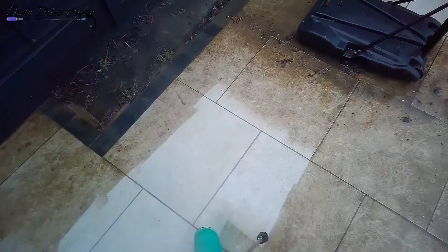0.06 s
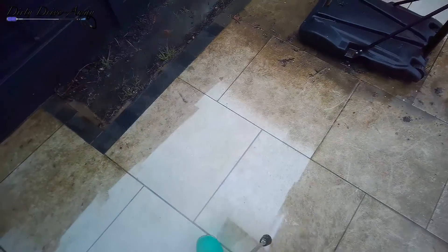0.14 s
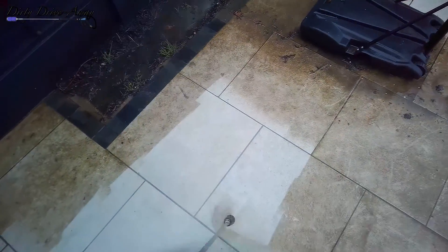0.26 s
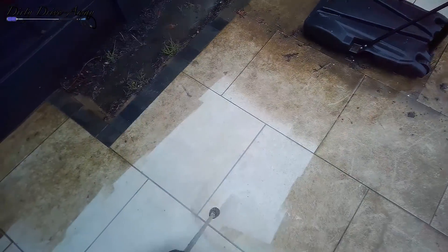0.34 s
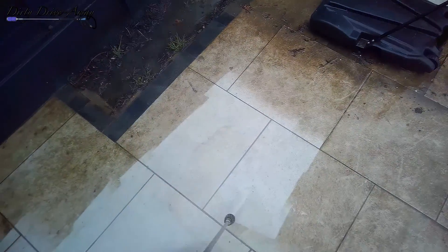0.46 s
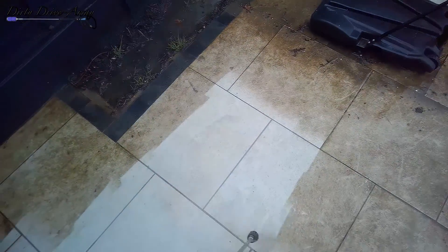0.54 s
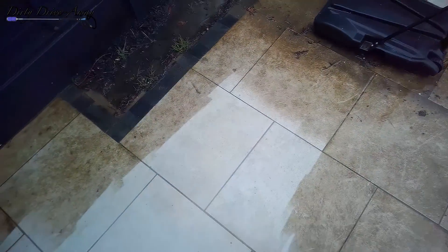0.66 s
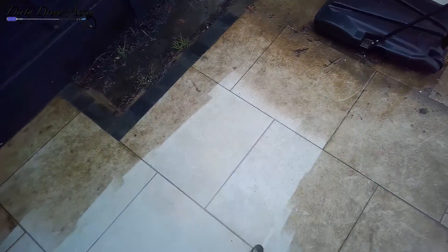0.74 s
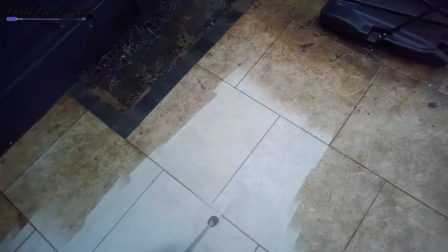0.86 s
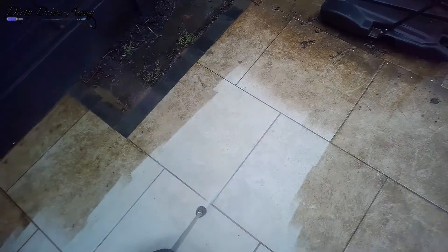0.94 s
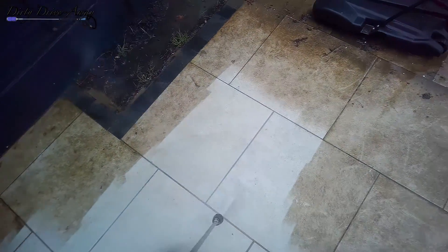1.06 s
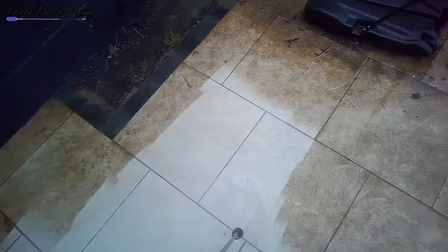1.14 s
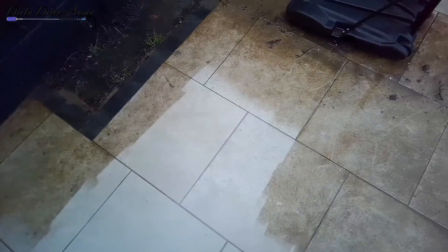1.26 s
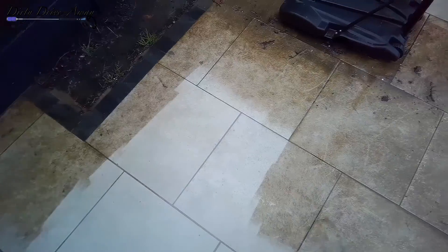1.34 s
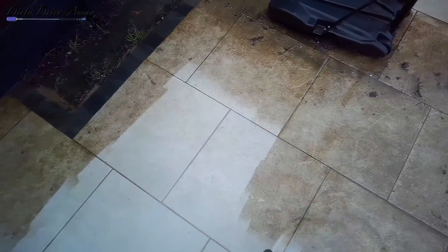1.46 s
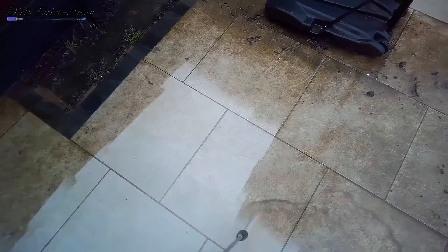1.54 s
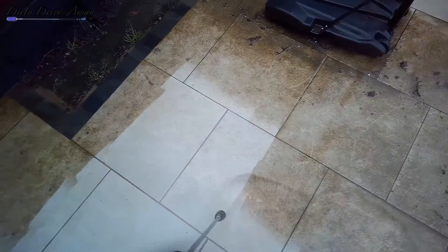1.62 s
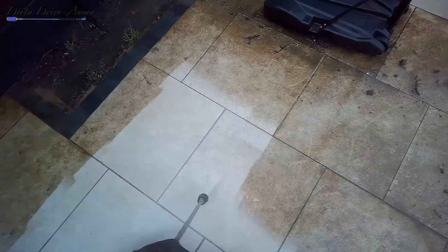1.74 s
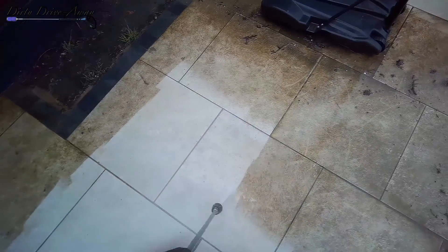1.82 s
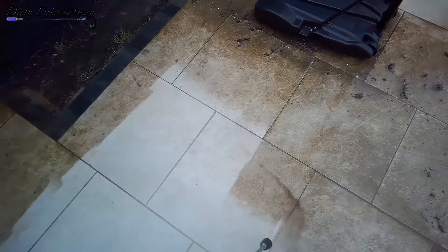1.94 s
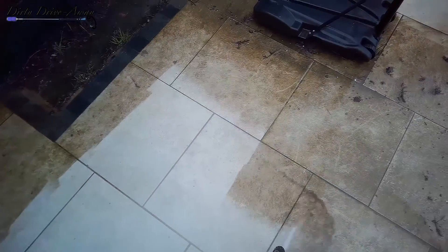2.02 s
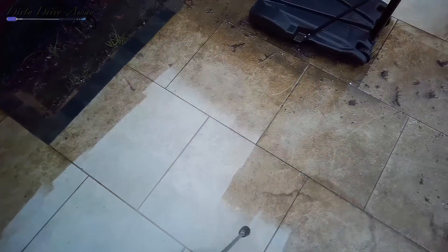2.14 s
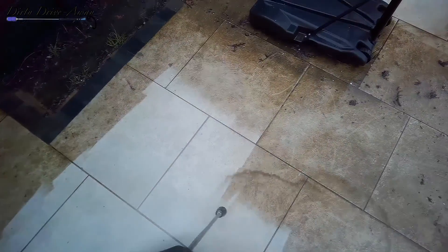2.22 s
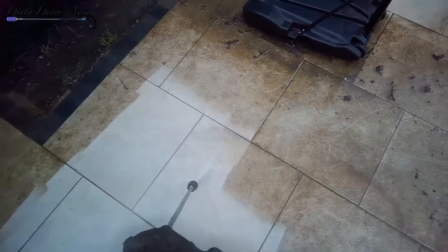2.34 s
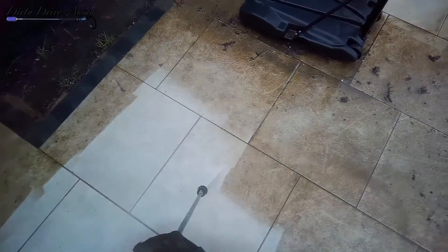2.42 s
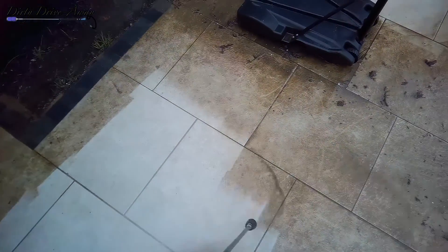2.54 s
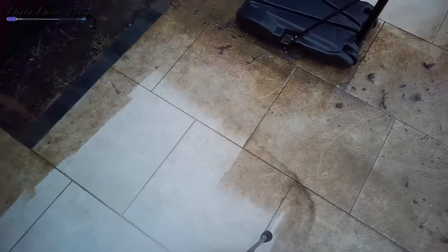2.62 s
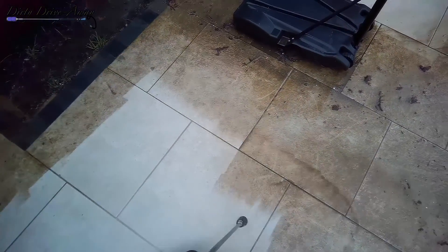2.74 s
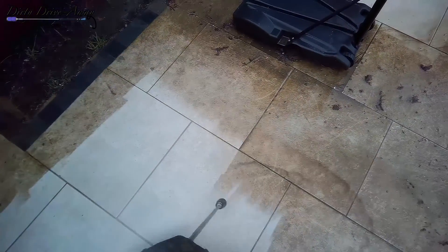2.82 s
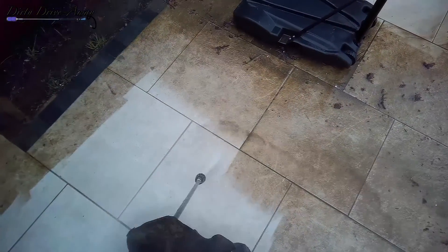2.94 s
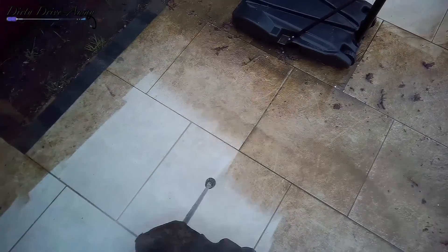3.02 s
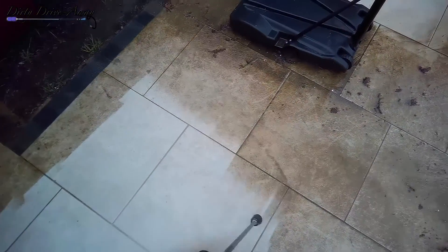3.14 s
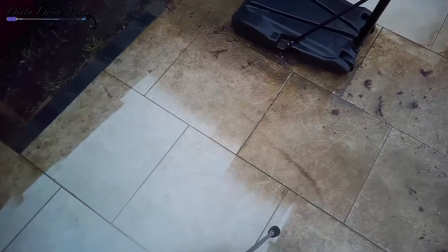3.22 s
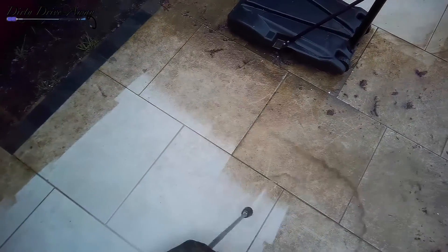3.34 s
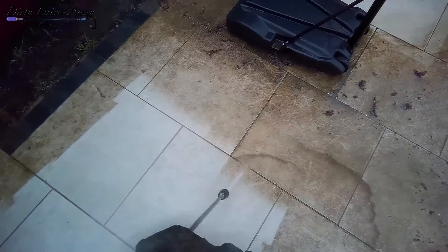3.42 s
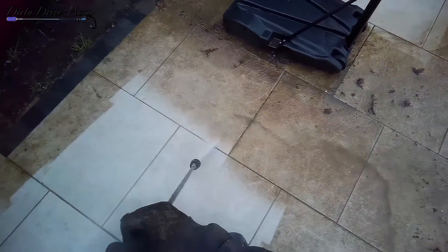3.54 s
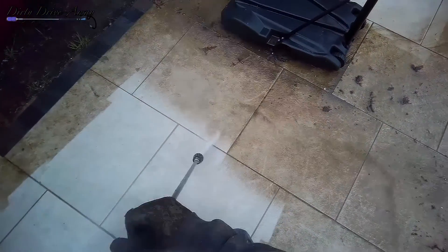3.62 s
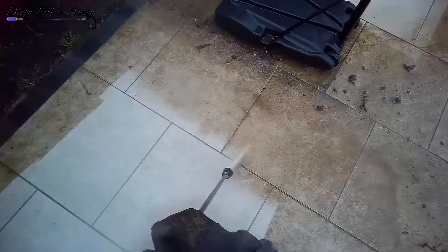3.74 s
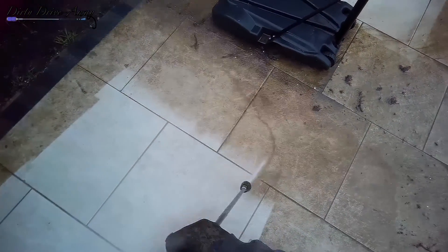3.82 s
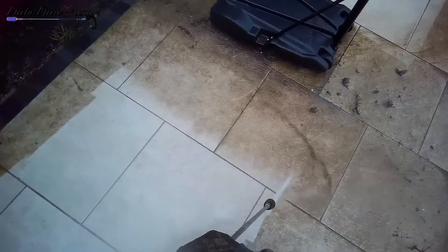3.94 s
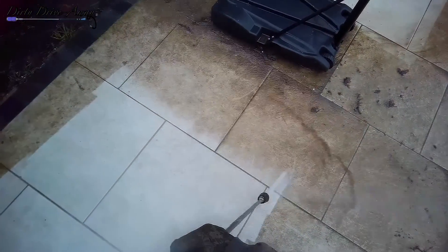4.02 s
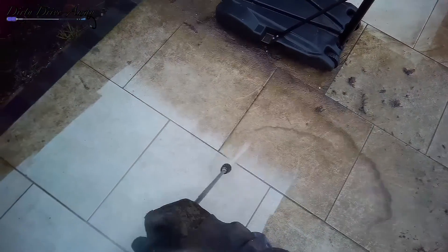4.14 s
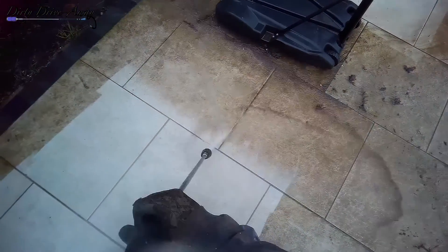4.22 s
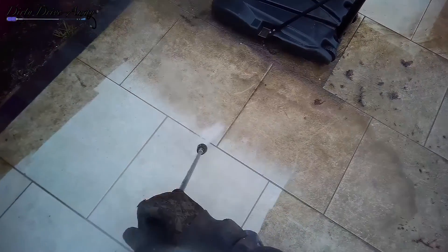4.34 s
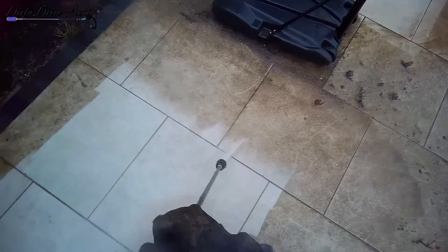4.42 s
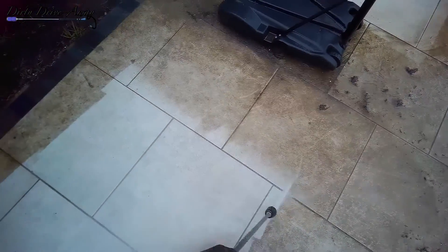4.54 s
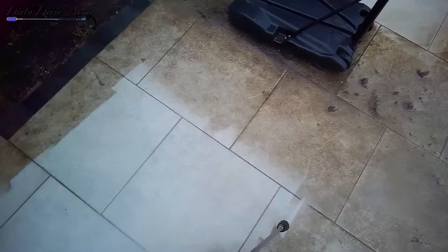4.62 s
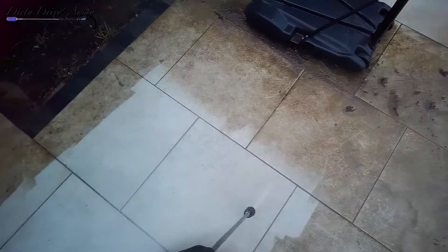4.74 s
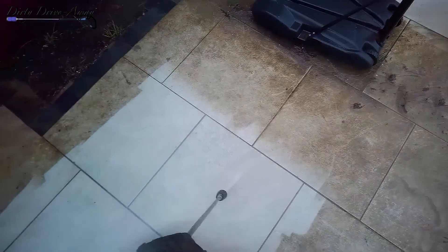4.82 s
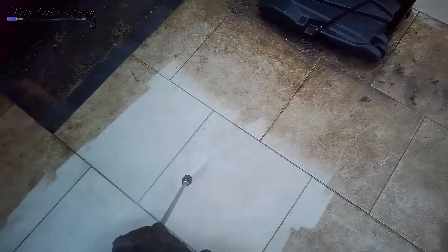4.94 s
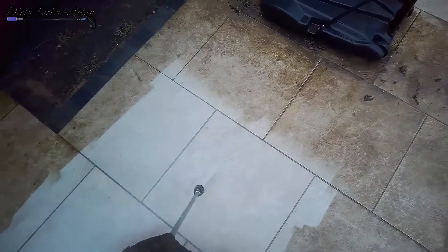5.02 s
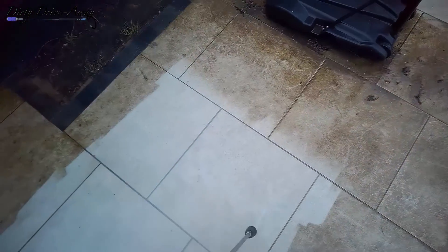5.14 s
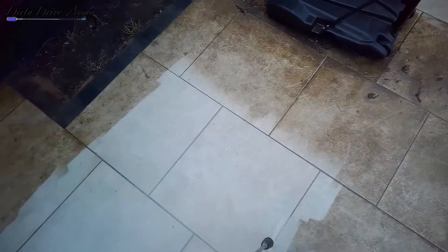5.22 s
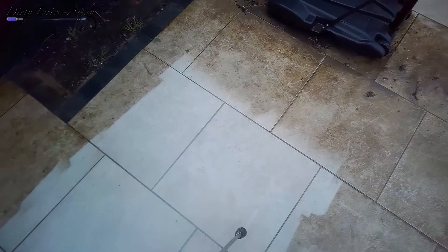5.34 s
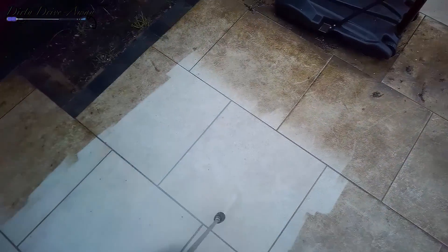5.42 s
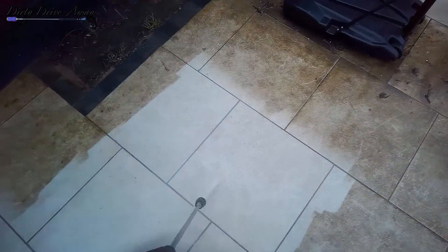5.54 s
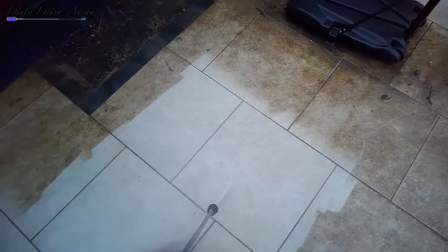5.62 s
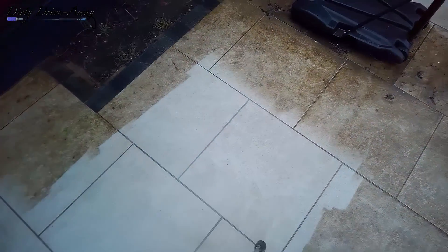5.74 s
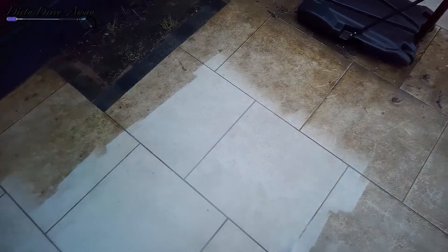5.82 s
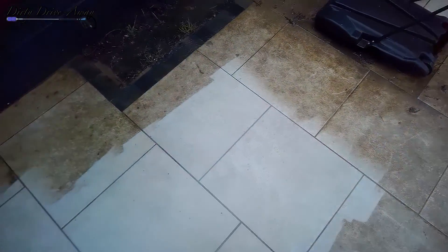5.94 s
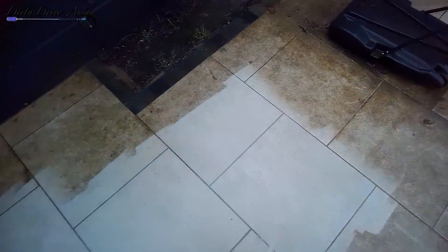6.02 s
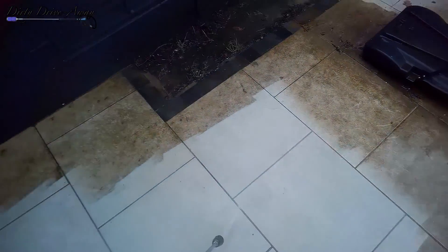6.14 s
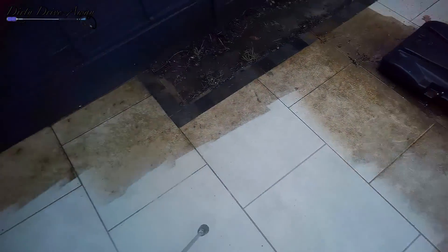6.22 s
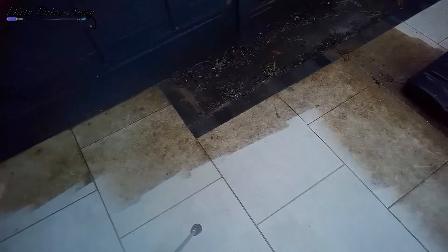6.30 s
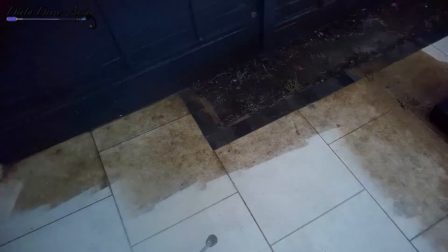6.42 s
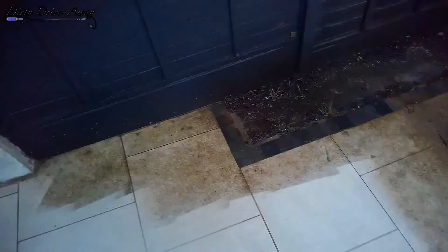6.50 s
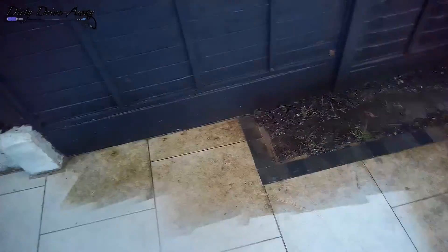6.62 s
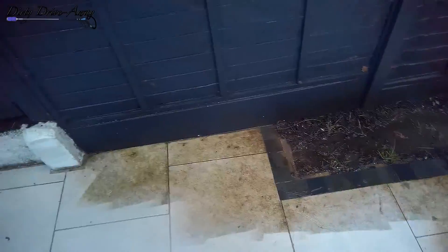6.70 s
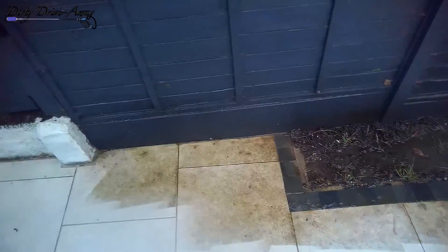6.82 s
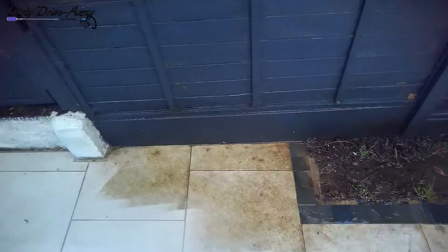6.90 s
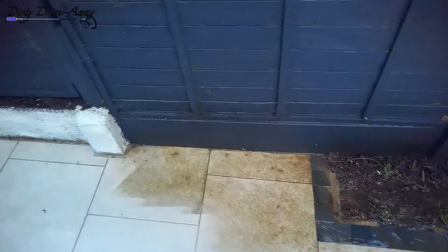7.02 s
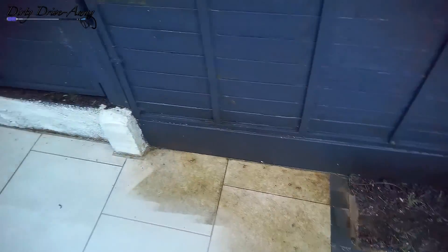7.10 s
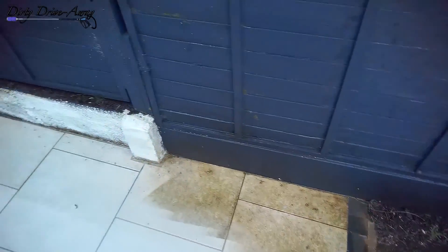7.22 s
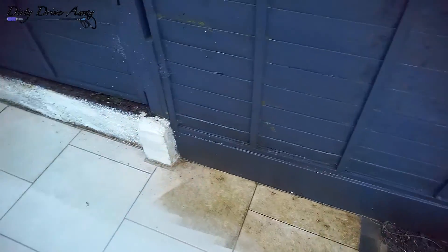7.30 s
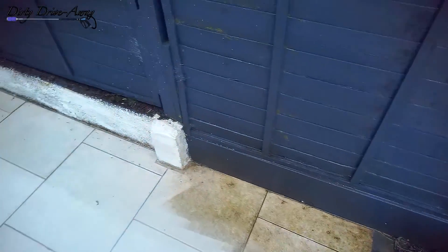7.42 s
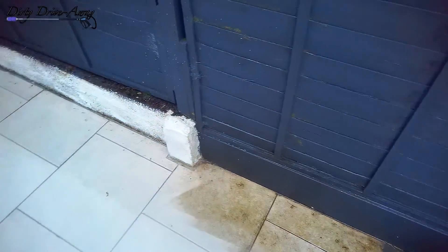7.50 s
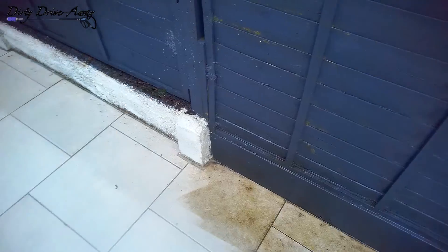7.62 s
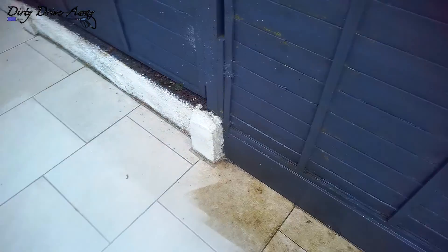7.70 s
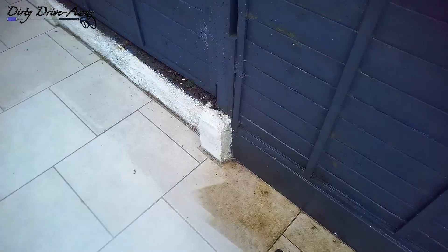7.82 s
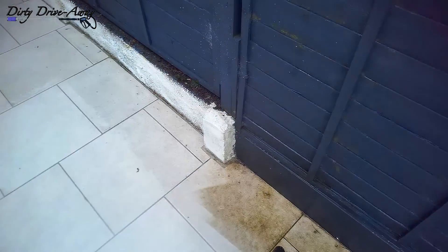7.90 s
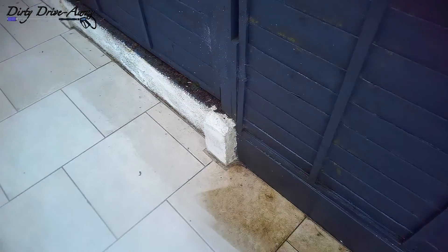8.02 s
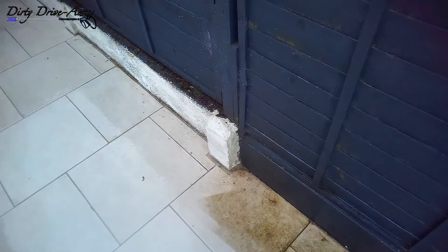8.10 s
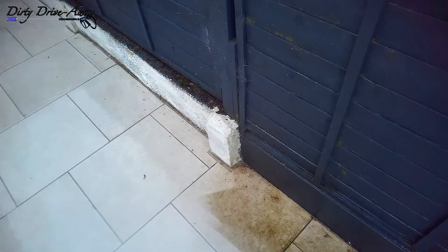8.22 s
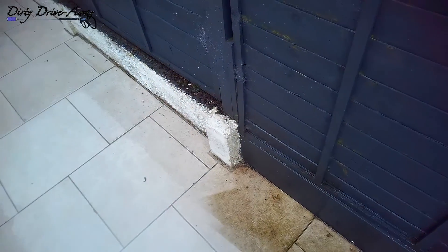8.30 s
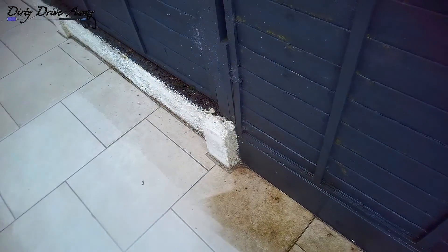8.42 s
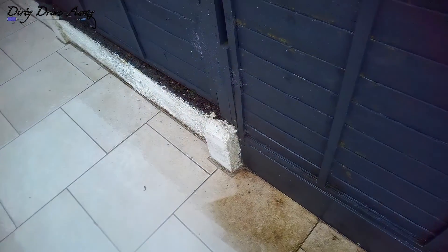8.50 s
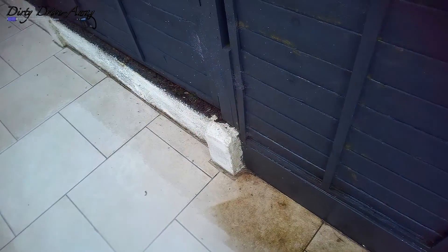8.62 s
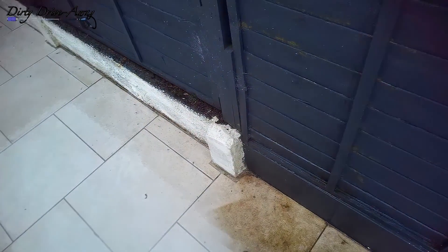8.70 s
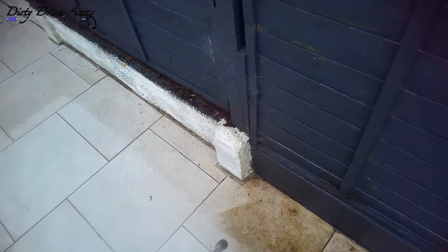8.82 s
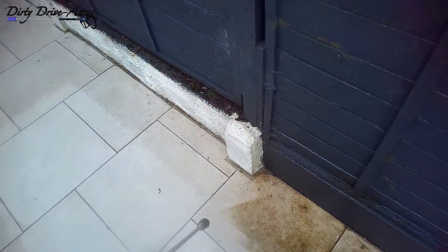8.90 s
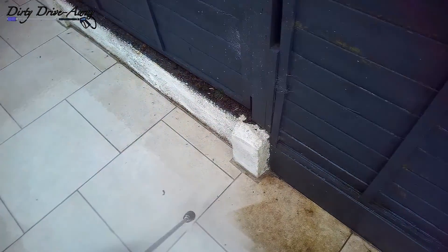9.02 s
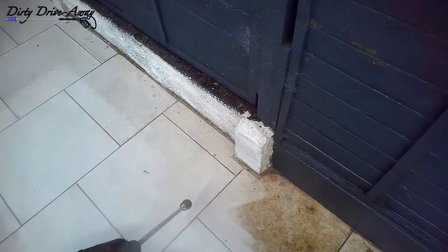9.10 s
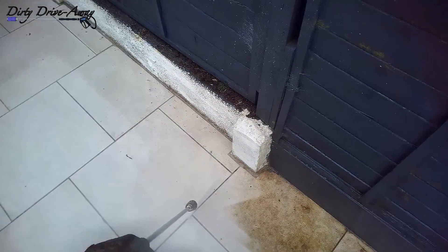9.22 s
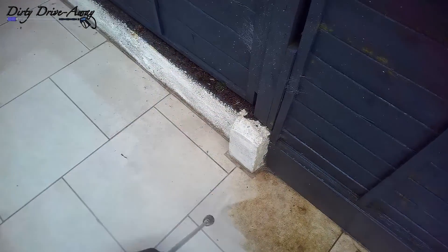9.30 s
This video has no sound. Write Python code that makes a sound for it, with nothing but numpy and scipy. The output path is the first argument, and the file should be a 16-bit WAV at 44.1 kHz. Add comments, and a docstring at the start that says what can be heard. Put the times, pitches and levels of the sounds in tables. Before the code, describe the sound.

A pressure washer jet sweeps loudly back and forth over stone slabs, cuts out to drips and quiet handling knocks, then blasts back.

```python
"""A pressure washer's fan jet sweeps to and fro over patio slabs: shaped noise, traded by lance pose.
At 6.3 s the trigger is let go: the jet dies, a valve thumps, drops ring, the pump stops, a dull drone lingers.
From 7 s the lance rustles, scrapes and knocks in the quiet: noise bursts and struck plastic modes.
At 9.0 s the trigger clicks and a dribble leads; the jet returns and builds until the input overloads.
Throughout, a small mono camera in a resonant housing hears a low hum and the yard, and whines faintly."""
import sys
import numpy as np
from scipy import signal
from scipy.fft import rfft, irfft, next_fast_len
from scipy.io import wavfile
from scipy.ndimage import uniform_filter1d

SR = 44100
rng = np.random.default_rng(int(sys.argv[2]) if len(sys.argv) > 2 else 0)


def boost_factor(decibels):
    """Convert a level in decibels to a linear amplitude factor."""
    exponent = np.asarray(decibels, float) / 20
    return 10 ** exponent


def inscribe(sig):
    """Save sig as 16-bit PCM at rate SR to the path in sys.argv[1].

    A 1-D sig is mono; a 2-D sig holds one channel per row.
    Samples are clipped to [-1, 1] before scaling.
    """
    pcm = np.round(np.clip(np.atleast_2d(sig).T, -1, 1) * 32767)
    wavfile.write(sys.argv[1], SR, pcm.astype(np.int16))


N = 412775
T = np.arange(N) / SR  # s

# Jet colours ahead of the housing. Each row: frequency in Hz, relative density in dB per Hz.
ROAR_COLOUR = [(30, -37), (200, -28), (400, -11.5), (800, 0.5), (1400, -1.5), (2500, -10), (3800, -9),
               (4600, -18.5), (9000, -45)]
SPLASH_COLOUR = [(2500, -18), (4000, -3.5), (4800, -3.5), (5500, -1.5), (7000, -4), (7700, -6),
                 (8500, -27.5), (15000, -40.5)]
MIST_COLOUR = [(6000, -28), (7600, -4), (8200, 1.5), (9400, 1), (10000, -7.5), (15000, -22)]
HISS_COLOUR = [(9000, -42.5), (11800, -17), (12700, 0.5), (14500, 7.5), (15300, 1.5), (15800, -3)]
SKIRT_COLOUR = [(8000, -29.5), (9800, -10), (10500, 0), (12000, -3.5), (12700, -13), (15000, -34.5)]
CHURN_COLOUR = [(100, -28), (200, -10), (350, 0), (550, 6), (900, -30)]
# Ends and hesitations of lance strokes. Each row: time in seconds, reach from 0 near to 1 far,
# nozzle turn to the microphone 0-1, nozzle lift off the slab 0-1.
LANCE_STROKES = [(0.0, 0.75, 0.16, .1), (0.23, 0.47, 0.4, 0.5), (0.52, 0.67, 0.27, 0.2),
                 (0.74, 0.39, .6, .85), (0.9, .35, .9, .9), (1.13, 0.84, 0.13, 0.03), (1.42, 0.21, .8, 1),
                 (1.64, 0.53, 0.8, .8), (1.86, 0.86, 0.12, 0.2), (2.0, 0.42, .7, .5),
                 (2.19, 0.032, 0.76, 0.83), (2.47, 0.89, 0.09, 0.1), (2.74, 0.29, .55, 0.46),
                 (3.06, 0.86, 0.08, .1), (3.36, .15, 0.35, 0.26), (3.72, 0.85, 0.03, 0.2),
                 (4.05, 0.23, 0.22, 0.35), (4.42, 1, 0.04, 0.5), (4.72, 0.34, 0.07, .15),
                 (4.86, 0.51, .4, 0.35), (5.06, 0.98, 0.08, .2), (5.37, 0.21, 0.65, 0.56),
                 (5.68, .75, .03, .05), (5.84, .35, .35, .6), (6.0, 0, 0.3, 0.8), (6.16, .4, .5, 0.9),
                 (6.29, 0.57, 0.05, 0.26)]
# Lance pose at the restart: reach, turn, lift, each 0-1 or slightly beyond.
RESTART_POSE = (1.03, 0.19, 0.62)
# Lance and trigger knocks. Each row: start in seconds, strength in dB, pitch centre in Hz,
# crack in dB over strength.
KNOCKS = [(7.244, -24.5, 2450, -6.5), (7.262, -26, 3100, -11.5), (7.81, -27, 1700, -10),
          (7.833, -37, 1800, -15.5), (8.377, -21, 1300, -14), (8.398, -17.5, 1300, -21),
          (8.402, -13, 1100, -20), (8.4054, -1, 1350, -15.5), (8.413, -16, 1900, -11.5),
          (8.455, -19, 2000, -13), (8.482, -16.5, 2000, -17), (8.4977, -10.5, 1500, -16),
          (8.511, -20.5, 1800, -17.5), (8.562, -4.5, 950, -19), (8.586, -18.5, 900, -12),
          (9.026, -13.5, 1100, -1.5), (9.03, -25.5, 1500, -5.5), (9.034, -13, 800, -20),
          (9.0695, -1, 900, -25)]
# Modes of the hollow lance. Each row: frequency in Hz, relative level in dB, t60 in seconds.
LANCE_MODES = [(430, 3.5, 0.018), (645, -2, 0.027), (900, -3, 0.016), (1310, 5, 0.012), (1704, 2.5, 0.017),
               (2020, -1, .018), (2450, -9, 0.021), (3360, -3, .02)]
# Modes of the valve thump. Each row: frequency in Hz, level in dB, t60 in seconds.
THUMP_MODES = [(163, -28, .25), (215, -30, 0.22), (270, -28, 0.29), (424, -36, .25), (499, -32, 0.34)]
# Scrapes of glove and lance. Each row: start in seconds, hold in seconds, level in dB,
# treble in dB over level.
SCRAPES = [(8.374, 0.023, -32, -18), (8.406, .02, -28, -7.5), (8.443, 0.03, -34, -6.5),
           (8.491, .03, -37, -11), (8.564, 0.031, -30, -22.5)]
# Falling drops. Each row: start in seconds, strength in dB, pitch in Hz.
DRIPS = [(6.4144, -23, 5920), (6.4224, -31, 5630), (6.4504, -29, 5900), (6.4854, -36.5, 5570),
         (6.5174, -28.5, 7350), (6.543, -20.5, 7200), (6.5654, -42.5, 5590), (6.6627, -31, 7250)]
# Drone resonances. Each row: frequency in Hz, width in Hz, relative level in dB.
DRONE_MODES = [(149, 30, -8), (262, 20, 0.5), (413, 22, -0.5), (670, 64, -4.5), (796, 40, -6.5)]
# Pump harmonics. Each row: multiple of shaft rate, relative level in dB.
PUMP_ORDERS = [(1, -11), (3, -9), (5, -6.5), (6, 0.5), (8, -4), (11, -6.5)]
# Yard colours ahead of the housing. Each row: frequency in Hz, relative density in dB per Hz.
YARD_LOW_COLOUR = [(18, -22), (30, -7.5), (54, -9), (87, 0.5), (130, 2), (308, 0), (420, 0), (814, -3.5),
                   (1440, -11), (1690, -13.5), (2400, -27.5), (3120, -52.5), (5280, -120)]
YARD_HIGH_COLOUR = [(1800, -23), (2600, 2.5), (3400, 1.5), (4200, -4), (7000, -8), (11000, -4.5),
                    (15800, -16.5)]
# Brief rustles. Each row: start in seconds, length in seconds, treble level in dB.
RUSTLES = [(7.0, .1, -62), (7.13, .1, -56.5), (7.22, .12, -56), (7.33, 0.23, -53), (7.78, .1, -63.5),
           (8.928, .16, -56.5)]
# Chirps in a picture frame. Each row: start in the frame in seconds, length in seconds,
# start pitch in Hz, end pitch in Hz.
CHIRPS = [(0, 0.013, 7000, 10800), (0.006, 0.018, 8750, 12500)]
# Air cavities of the camera housing. Each row: frequency in Hz, width in Hz, boost in dB.
HOUSING_CAVITIES = [(1883, 352, 12), (3346, 614, 8), (5757, 420, 11), (7185, 390, 8), (9060, 440, 4.5),
                    (6400, 270, -3.5), (9770, 400, -1.5), (10800, 350, -3), (11600, 310, 1),
                    (12600, 400, 2.5), (14300, 900, -7)]

ROAR_DB, ROAR_FAR_DB, ROAR_LIFT_DB = -10, 0.66, -0.64  # near; gained at full reach; gained at full lift
SPLASH_NEAR_DB, SPLASH_FAR_DB = -9.5, -1.5  # over the roar
HISS_AWAY_DB, HISS_FACING_DB = -28.5, -6  # over the roar: floor; added when facing
SKIRT_DOWN_DB, SKIRT_LIFTED_DB = -25.5, -13.5  # over the roar: floor; added when lifted
BEAM_EXPONENT, SHADE_DB = 0.68, -4  # hiss comes in early in a turn; the hand shades it at the near end
DULL_DB_PER_DB, DULLEST_DB = .15, -5  # weak flow splashes less
REACH_SNAP, WRIST_SNAP, LIFT_SNAP = 3.0, 6.5, 4.0  # abruptness between stroke ends
SHUT_S, COLLAPSE_T60_S = 6.319, 0.056
SETTLE_DB, SETTLE_HOLD_S, SETTLE_T60_S = -16, .06, .6  # airborne spray
DRIBBLE_S, DRIBBLE_DB, DRIBBLE_T60_S = 9.036, -25.5, .8
OPEN_S, STRIKE_S, STRIKE_DB, BUILD_DB_PER_S = 9.071, 0.015, -3.5, 19
GUST_DB, GUST_PEAK_S, GUST_RISE_DB_PER_S, GUST_FALL_DB_PER_S = -38, 9.3, 120, 75
THUMP_S = 6.51
SCRAPE_ATTACK_S, SCRAPE_T60_S = .003, 0.21
DRONE_S, DRONE_DB, DRONE_FADE_DB_PER_S = 6.56, -41.5, 4
DRONE_END_S, DRONE_TAIL_T60_S = 7.62, 1.1
PUMP_HZ, PUMP_DB, PUMP_STOP_S = 23.1, -50.5, 6.6
HUM_HZ, HUM_DB = 48.0, -55
YARD_DB, YARD_TREBLE_DB = -44.5, -59
RUNOFF_S, RUNOFF_RISE_S, RUNOFF_DB, RUNOFF_T60_S = 6.45, .06, -35, 0.55  # low swell after the flow shuts
TRICKLE_DB, TRICKLE_T60_S = -54.5, 1.2  # treble left behind by the spray
FRAME_HZ, FRAME_START_S = 30.0, .030
WHINE_DB, WHINE_WANDER_DB, SELF_NOISE_DB = -67, 1.5, -62.5


def jet():
    """Water roars on stone; lance angle trades slab splash against hiss straight from the nozzle."""
    reach, turned, lifted = pose()
    water = flow()
    bright = np.clip(np.minimum(water, 1) ** DULL_DB_PER_DB, boost_factor(DULLEST_DB), 1)
    splash_db = SPLASH_NEAR_DB + (SPLASH_FAR_DB - SPLASH_NEAR_DB) * reach
    facing_db = HISS_FACING_DB + SHADE_DB * np.clip(1 - reach, 0, 1) ** 2
    hiss = boost_factor(HISS_AWAY_DB) + boost_factor(facing_db) * np.clip(turned, 0, None) ** BEAM_EXPONENT
    skirt = boost_factor(SKIRT_DOWN_DB) + boost_factor(SKIRT_LIFTED_DB) * np.clip(lifted, 0, None)
    # pointed away, the jet piles up water and churns low
    churn = boost_factor(-32) * np.clip(hiss, boost_factor(-24.5), 1) ** -0.69

    out = noise(ROAR_COLOUR, 1.5, 0.63, 12.)
    out = out + bright * boost_factor(splash_db) * noise(SPLASH_COLOUR, 1.5, 0.31, 8.4)
    # the finest mist follows the lance angle less than the splash does
    out = out + boost_factor(-10.5 + 0.31 * splash_db) * noise(MIST_COLOUR, 1.7, 1.0, 9.)
    out = out + bright * hiss * noise(HISS_COLOUR, 1.5, .8, 9.)
    out = out + bright * skirt * noise(SKIRT_COLOUR, 1.5, 0.91, 6.6)
    out = out + churn * noise(CHURN_COLOUR, 0., 1.7, 8.)
    level_db = ROAR_DB + ROAR_FAR_DB * reach + ROAR_LIFT_DB * lifted + 0.33 * walk(30)
    return out * water * boost_factor(level_db)


def pose():
    """Reach, turn and lift; each slows into the stroke ends and moves fastest mid-stroke."""
    rows = np.array(LANCE_STROKES)
    index = np.arange(len(rows))
    place = np.interp(T, rows[:, 0], index)
    out = []
    for ends, again, snap in zip(rows.T[1:], RESTART_POSE, (REACH_SNAP, WRIST_SNAP, LIFT_SNAP)):
        eased = np.floor(place) + .5 + np.tanh(snap * (place % 1 - .5)) / np.tanh(snap / 2) / 2
        out.append(np.where(T < DRIBBLE_S, np.interp(eased, index, ends), again))
    return out


def flow():
    """Water through the nozzle, 1 at working pressure: collapse, settling spray, dribble, rebuild."""
    shut_s = np.clip(T - SHUT_S, 0, None)
    settle = boost_factor(SETTLE_DB)
    collapsing = (1 - settle) * boost_factor(-60 * shut_s / COLLAPSE_T60_S)
    settling = settle * boost_factor(-60 * np.clip(shut_s - SETTLE_HOLD_S, 0, None) / SETTLE_T60_S)
    dribble = boost_factor(DRIBBLE_DB) * burst(DRIBBLE_S, .006, .02, DRIBBLE_T60_S)
    opened_s = np.clip(T - OPEN_S, 0, None)
    restart = (1 - np.exp(-opened_s / STRIKE_S)) * boost_factor(STRIKE_DB + BUILD_DB_PER_S * opened_s)
    return collapsing + settling + dribble + restart


def gust():
    """Air pushed by the reopening jet rumbles on the microphone."""
    rise_db = GUST_RISE_DB_PER_S * (GUST_PEAK_S - T)
    fall_db = GUST_FALL_DB_PER_S * (T - GUST_PEAK_S)
    rumble = noise([(20, -3), (50, 0.5), (300, -10.0), (600, -31.0)], 0., 2.5, 14.0)
    return boost_factor(GUST_DB - np.maximum(rise_db, fall_db)) * rumble


def handling():
    """All contact sounds: valve thump, lance and trigger knocks, scrapes."""
    return thump() + knocks() + scrapes()


def thump():
    """The shut valve rings a few low damped modes."""
    return sum(ring(THUMP_S, *mode, 0.013) for mode in THUMP_MODES)


def knocks():
    """Hollow plastic rings in damped modes under a short noise crack."""
    out = np.zeros(N)
    crack = noise([(300, 8), (1500, 3.5), (4000, -12), (15000, -20.0)])
    for s, db, centre_hz, crack_db in KNOCKS:
        for k, (hz, mode_db, t60_s) in enumerate(LANCE_MODES):
            # where and how hard it is struck picks the modes near one pitch
            ring_db = db - 6 + mode_db - 7.4 * np.log2(hz / centre_hz) ** 2
            out = out + (-1) ** k * ring(s, hz, ring_db, t60_s, 0.00099)
        out = out + boost_factor(db + crack_db) * click(s, 0.0027) * crack
    return out


def scrapes():
    """Glove and lance rub: grainy noise bursts of low rub and treble rasp."""
    rub = noise([(300, -2), (700, -0.5), (2000, -6), (3800, -18.5), (4400, -38)], 1.5, 1.6, 120.)
    rasp = noise([(3500, -14), (5000, -5.5), (9500, -2), (15500, -12.5)], 1.5, 1.2, 120.)
    out = np.zeros(N)
    for s, hold_s, db, treble_db in SCRAPES:
        envelope = burst(s, SCRAPE_ATTACK_S, hold_s, SCRAPE_T60_S)
        out = out + boost_factor(db) * envelope * (rub + boost_factor(treble_db) * rasp)
    return out


def drips():
    """Each late drop ticks on the slab: a tiny ring and a click."""
    tick = noise([(4000, -27.5), (6500, 0.5), (15000, -3)], 1.5)
    out = np.zeros(N)
    for s, db, hz in DRIPS:
        out = out + ring(s, hz, db + 0.5, 0.0065, 0.00017)
        out = out + boost_factor(db - 8.5) * click(s, .001) * tick
    return out


def drone():
    """Noise rings in a few narrow low resonances, each wavering alone."""
    out = np.zeros(N)
    for hz, width_hz, db in DRONE_MODES:
        band = signal.lfilter(*signal.iirpeak(hz, hz / width_hz, fs=SR), rng.standard_normal(N))
        out = out + boost_factor(db + 3.0 * walk(7.5)) * band / np.sqrt(width_hz)
    envelope = burst(DRONE_S, .04, DRONE_END_S - DRONE_S, DRONE_TAIL_T60_S)
    return boost_factor(DRONE_DB - DRONE_FADE_DB_PER_S * (T - DRONE_S)) * envelope * out / np.std(out)


def pump():
    """Piston pump far off: shaft harmonics while it runs, and a low hum that never stops."""
    running = np.interp(T, [0, PUMP_STOP_S, PUMP_STOP_S + 0.17, OPEN_S, OPEN_S + .25], [1, 1, 0, 0, 1])
    shaft = phase(PUMP_HZ * (1 + .003 * walk(2)))
    pistons = np.zeros(N)
    for order, db in PUMP_ORDERS:
        pistons = pistons + boost_factor(db + 1.5 * walk(5.9)) * np.sin(order * shaft + rng.uniform(0, 2 * np.pi))
    hum = boost_factor(HUM_DB + 1.6 * walk(4)) * np.sin(phase(HUM_HZ * (1 + .02 * walk(6))))
    return np.sqrt(2) * (boost_factor(PUMP_DB) * running * pistons + hum)  # levels are rms


def yard():
    """Noise in two bands: distant traffic below, trickling water and clothing above."""
    low = boost_factor(YARD_DB) + boost_factor(RUNOFF_DB) * burst(RUNOFF_S, RUNOFF_RISE_S, 0.11, RUNOFF_T60_S)
    high = boost_factor(YARD_TREBLE_DB) + boost_factor(TRICKLE_DB) * burst(SHUT_S, .01, 0, TRICKLE_T60_S)
    high = high + sum(boost_factor(db) * swell(s, length_s) for s, length_s, db in RUSTLES)
    return low * noise(YARD_LOW_COLOUR, 0., 0.81, 8.6) + high * noise(YARD_HIGH_COLOUR, 2.0, 1.5, 25.)


def whine():
    """Camera electronics: two breathy rising chirps per picture frame, over self-noise."""
    chirps = np.zeros(N)
    into_s = (T - FRAME_START_S) % (1 / FRAME_HZ)
    for start_s, length_s, from_hz, to_hz in CHIRPS:
        part = np.clip((into_s - start_s) / length_s, 0, 1)
        hz = (from_hz + (to_hz - from_hz) * part ** .7) * (1 + .07 * walk(45))
        breath = (1.0 + walk(1200)) * boost_factor(1.5 * walk(30))
        chirps = chirps + np.sin(np.pi * part) * breath * np.sin(phase(hz))
    self_noise = boost_factor(SELF_NOISE_DB) * noise([(2000, -20), (5000, -7), (15900, -2.0)])
    return boost_factor(WHINE_DB + WHINE_WANDER_DB * walk(2.99)) * chirps + self_noise


def noise(points, grain=0., flicker_db=0., rate_hz=20.):
    """Coloured noise of rms 1 through the housing; grain spreads the sizes of single drops."""
    size = next_fast_len(N)
    drops = rng.standard_normal(N) * boost_factor(grain * rng.exponential(size=N))
    coloured = irfft(rfft(drops, size) * gain_at(points, size), size)[:N]
    x = housing(coloured) * boost_factor(flicker_db * walk(rate_hz))
    return x / np.std(x)


def gain_at(points, size):
    """Gain of (Hz, dB) points on the bins of a transform, interpolated over log frequency."""
    hz, db = np.transpose(points)
    bins_hz = np.fft.rfftfreq(size, 1 / SR)
    return boost_factor(np.interp(np.log(bins_hz + 1), np.log(hz), db, left=-70, right=db[-1]))


def housing(x):
    """Causal resonators lift or cut each cavity band in turn."""
    for hz, width_hz, boost_db in HOUSING_CAVITIES:
        x = x + (boost_factor(boost_db) - 1) * signal.lfilter(*signal.iirpeak(hz, hz / width_hz, fs=SR), x)
    return x


def walk(rate_hz):
    """Random levels held 1 / rate_hz and slewed twice; spread near 1."""
    k = int(SR / rate_hz)
    held = np.repeat(rng.standard_normal(N // k + 1), k)
    return 1.56 * uniform_filter1d(uniform_filter1d(held, k), k)[:N]


def phase(hz):
    """Running phase in radians of a varying pitch."""
    return 2 * np.pi * np.cumsum(hz) / SR


def ring(s, hz, db, t60_s, attack_s=.0005):
    """A damped sine struck at time s."""
    out, first = np.zeros(N), int(s * SR) + 1
    t = T[first:first + int(2 * t60_s * SR)] - s
    envelope = (1 - np.exp(-t / attack_s)) * np.exp(-np.log(1000) * t / t60_s)
    out[first:first + len(t)] = boost_factor(db) * envelope * np.sin(2 * np.pi * hz * t)
    return out


def click(s, decay_s):
    """Envelope: jumps at time s, decays exponentially."""
    return (T > s) * np.exp(-np.clip(T - s, 0, None) / decay_s)


def burst(s, attack_s, hold_s, t60_s):
    """Envelope: rises from time s, holds, then dies away."""
    rise = 1 - np.exp(-np.clip(T - s, 0, None) / attack_s)
    return rise * boost_factor(-60 * np.clip(T - s - hold_s, 0, None) / t60_s)


def swell(s, length_s):
    """Envelope: one smooth hump."""
    return np.sin(np.pi * np.clip((T - s) / length_s, 0, 1)) ** 2


def scene():
    """One microphone, copied to both channels."""
    mono = jet() + gust() + handling() + drips() + drone() + pump() + yard() + whine()
    return np.tile(mono, (2, 1))


def low_pass(x):
    """Removes everything above the highest recorded frequency."""
    return signal.sosfilt(signal.butter(12, 15980, fs=SR, output="sos"), x)


def record(dry):
    """The input clips at full scale."""
    mix = np.clip(dry, -1, 1)
    return low_pass(mix)


dry = scene()
out = record(dry)
inscribe(out)
```